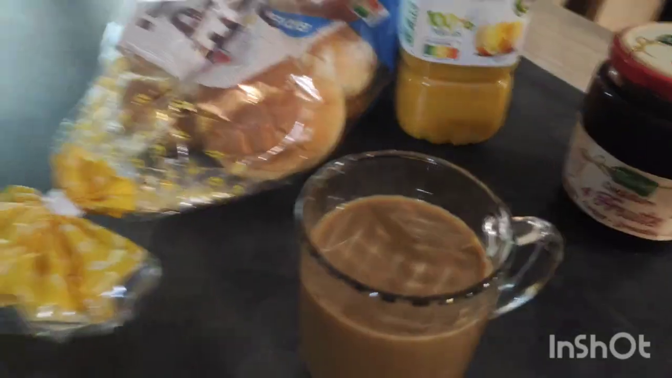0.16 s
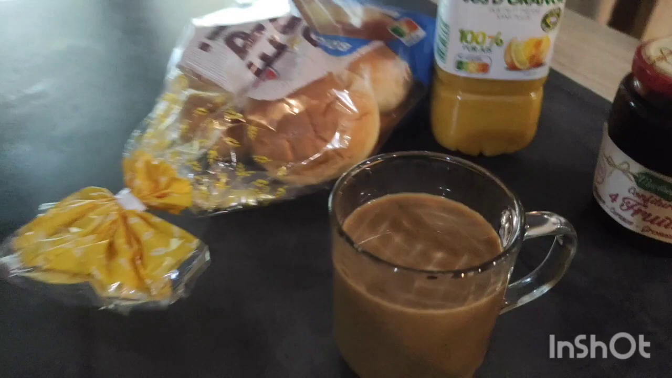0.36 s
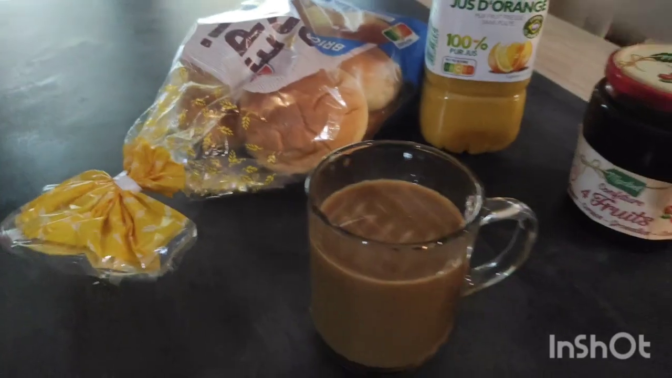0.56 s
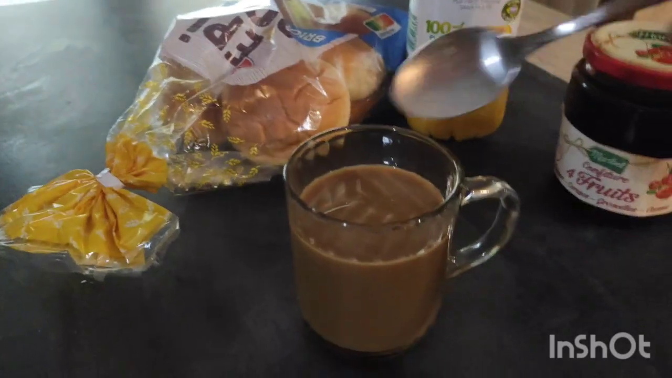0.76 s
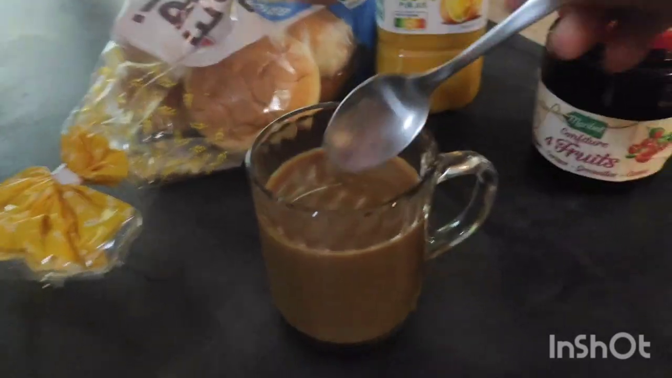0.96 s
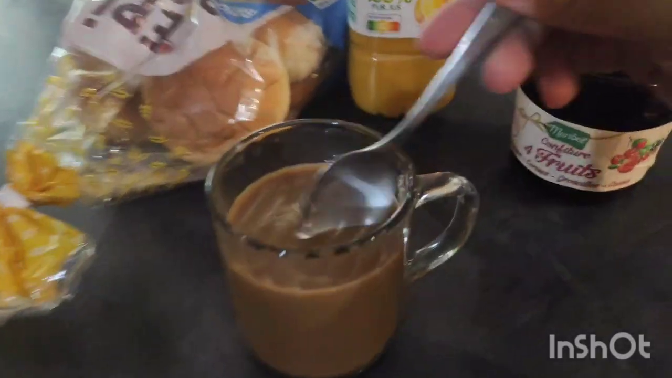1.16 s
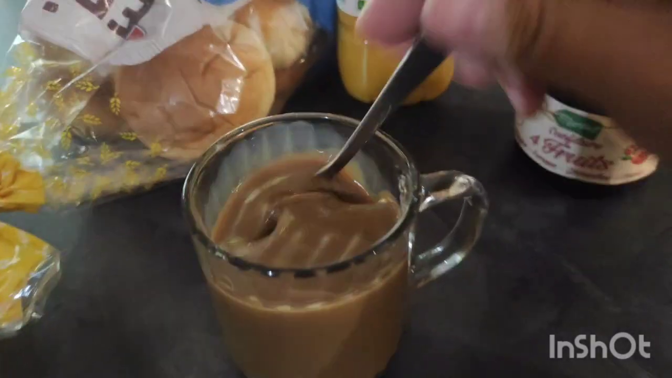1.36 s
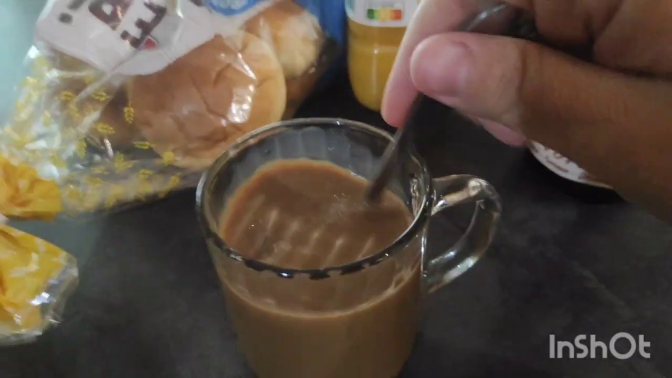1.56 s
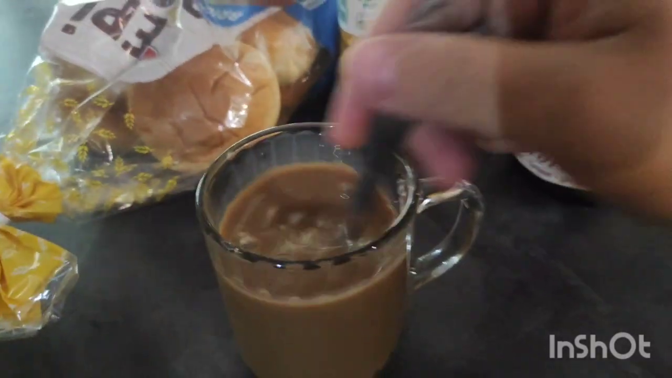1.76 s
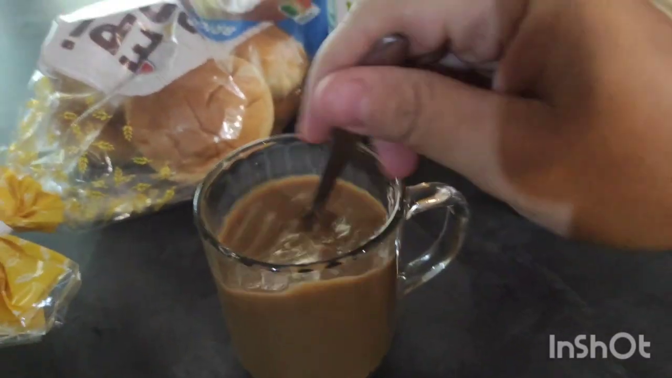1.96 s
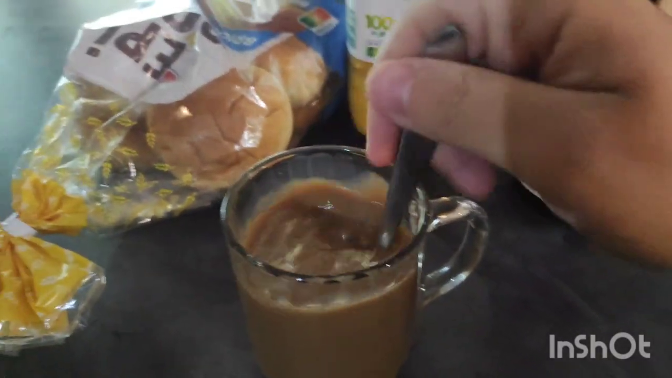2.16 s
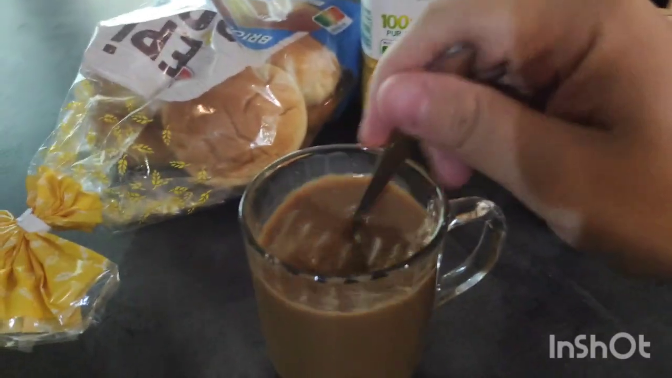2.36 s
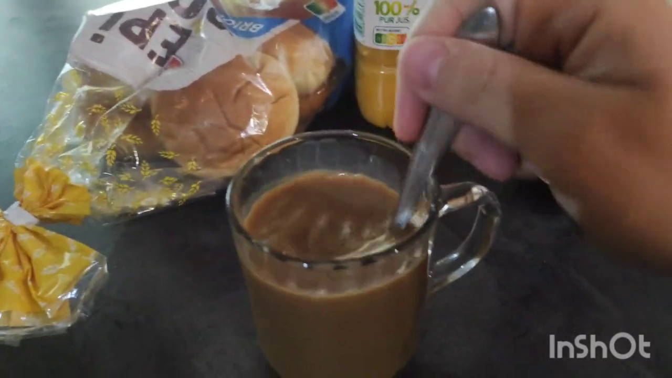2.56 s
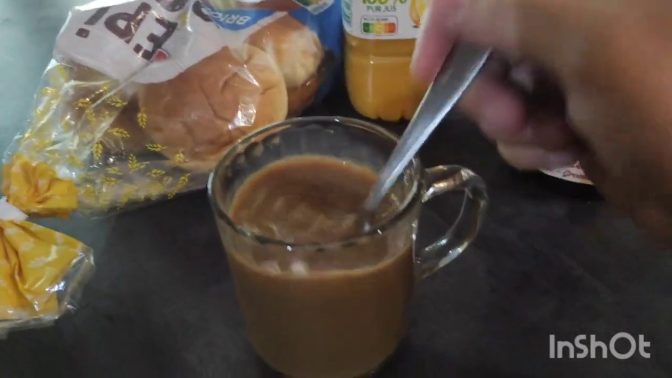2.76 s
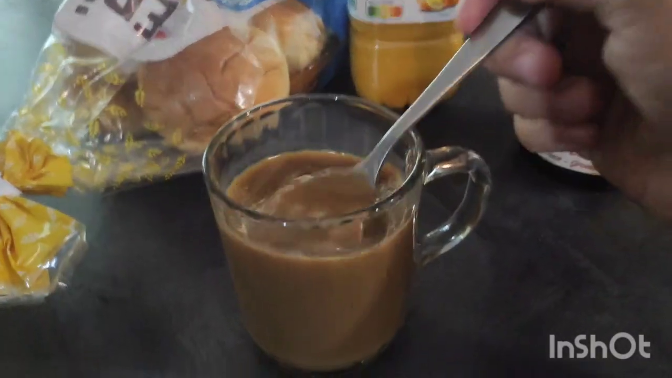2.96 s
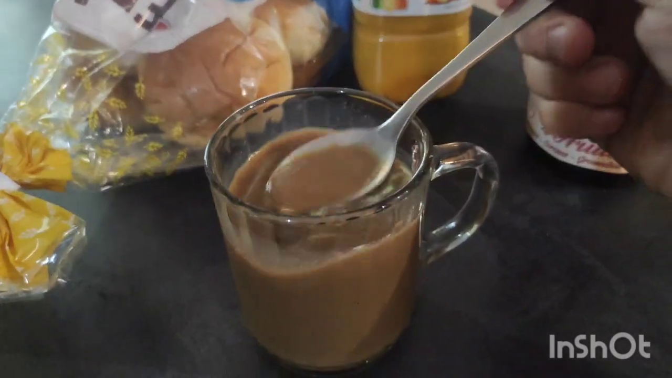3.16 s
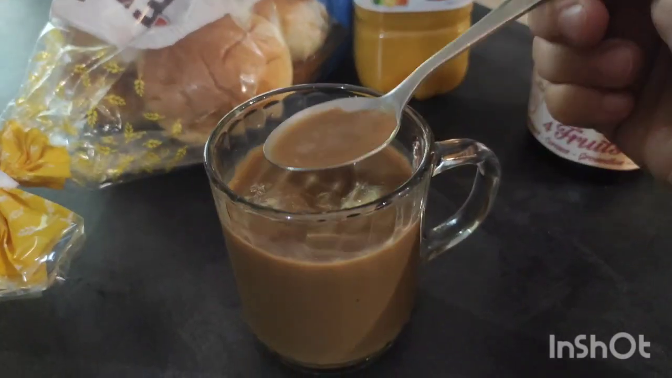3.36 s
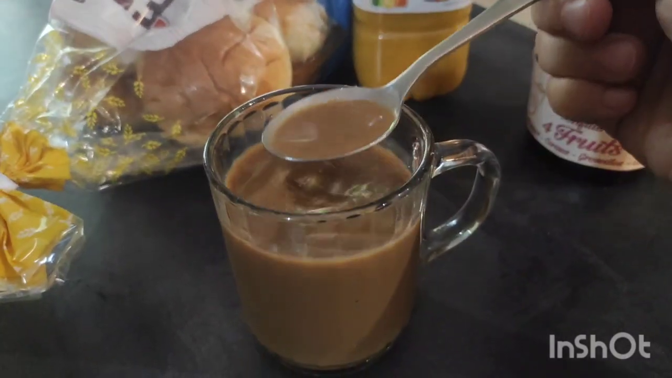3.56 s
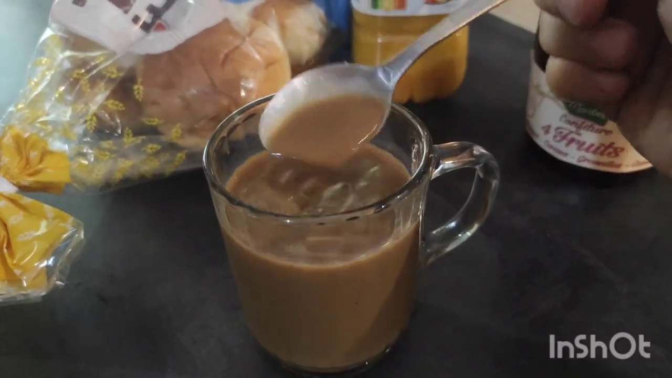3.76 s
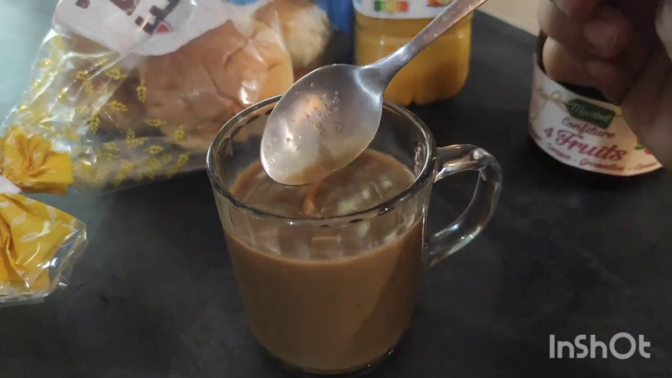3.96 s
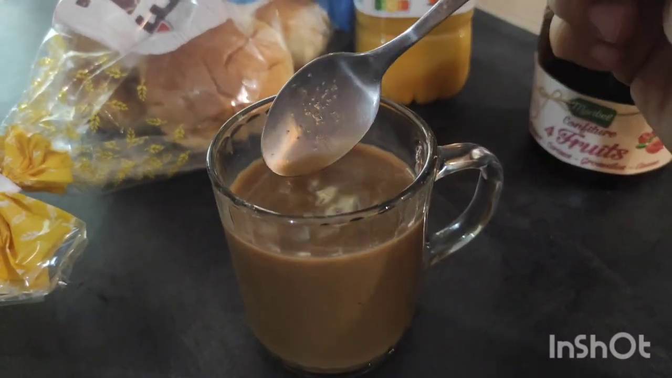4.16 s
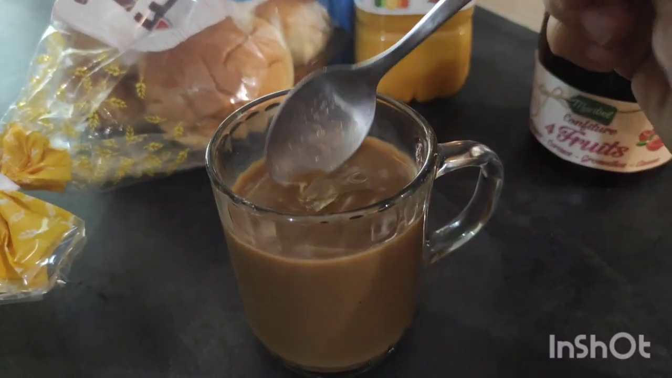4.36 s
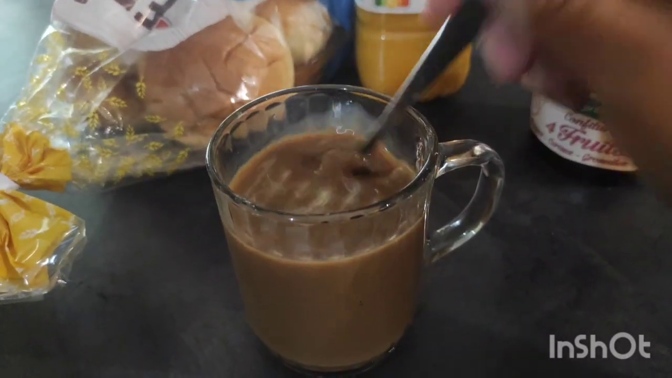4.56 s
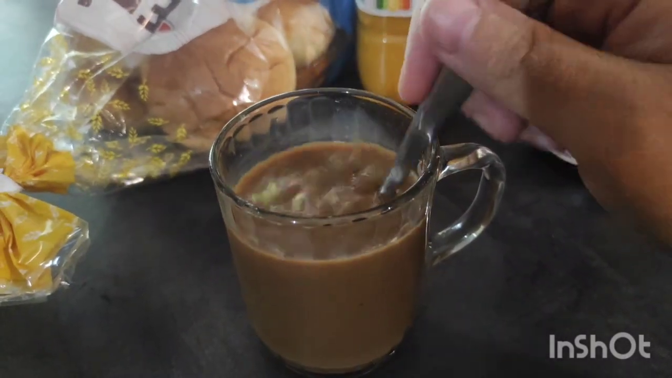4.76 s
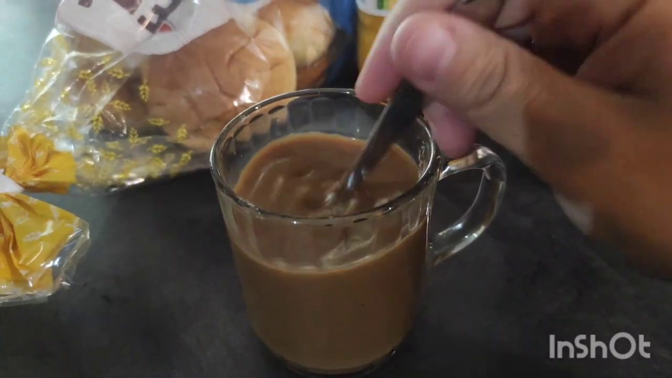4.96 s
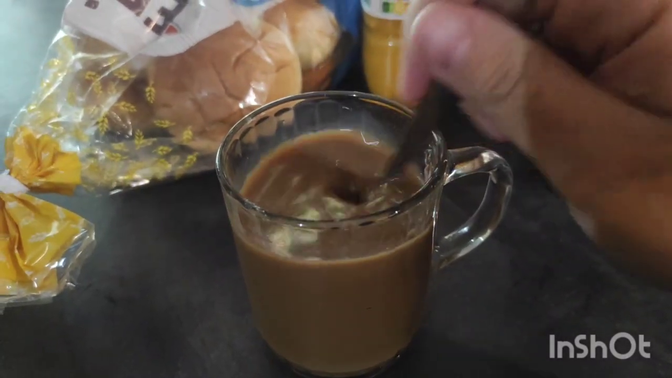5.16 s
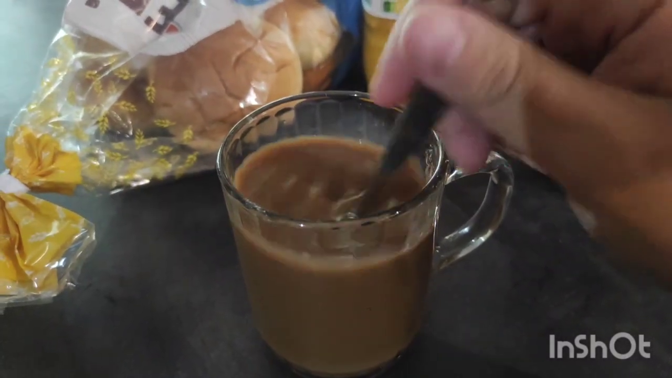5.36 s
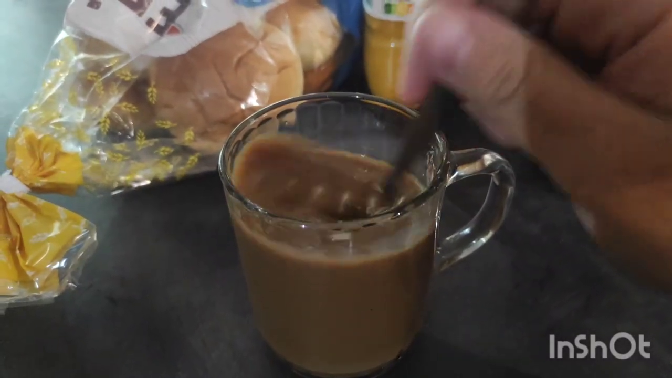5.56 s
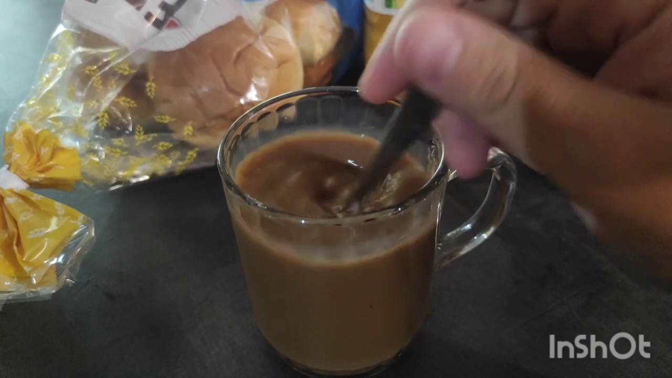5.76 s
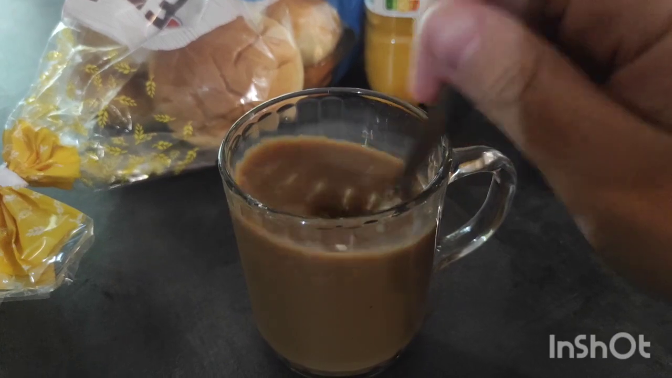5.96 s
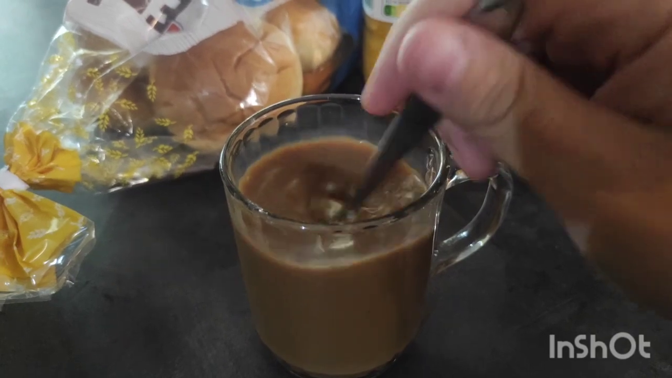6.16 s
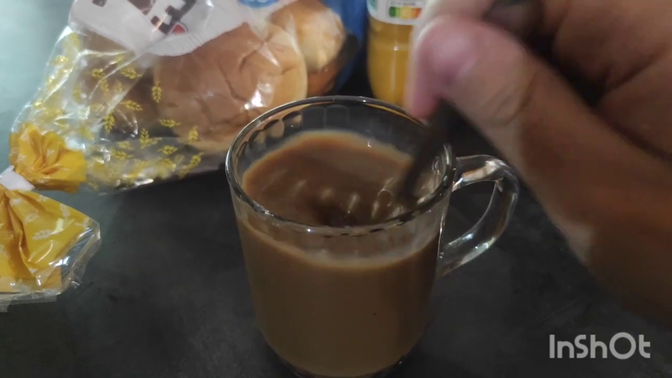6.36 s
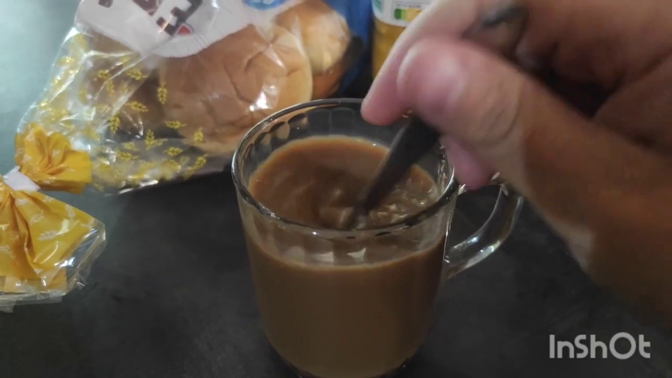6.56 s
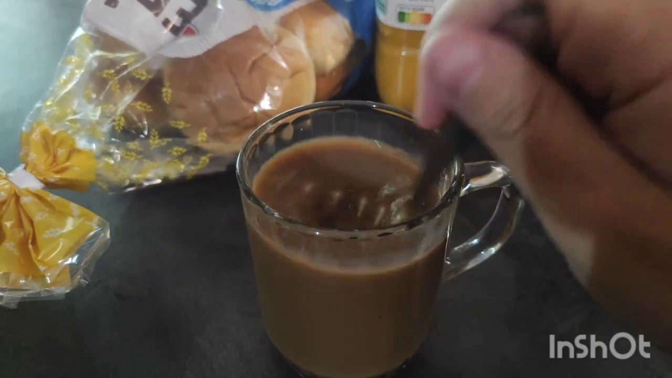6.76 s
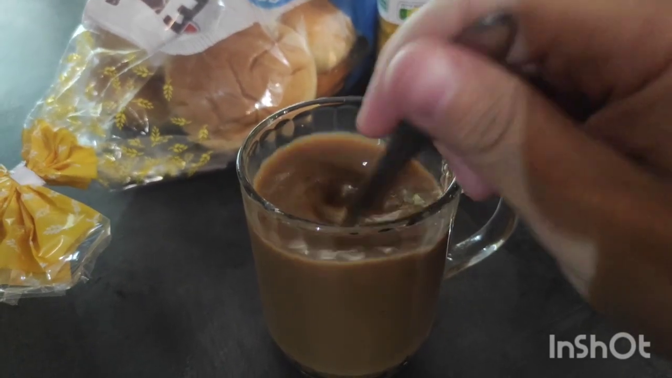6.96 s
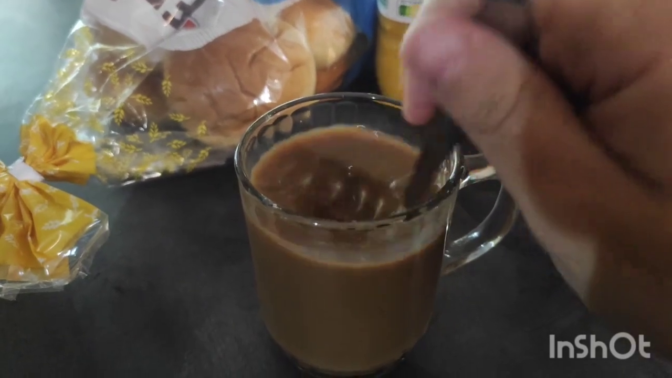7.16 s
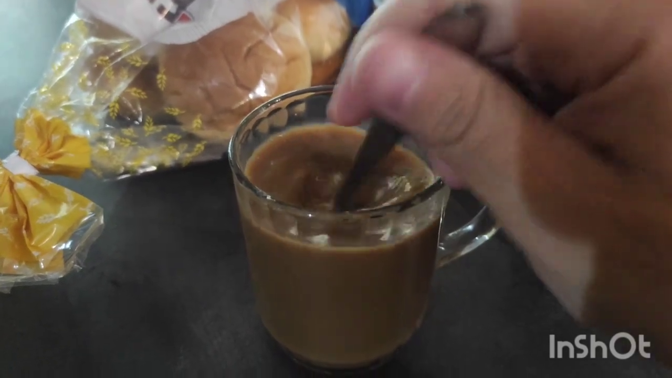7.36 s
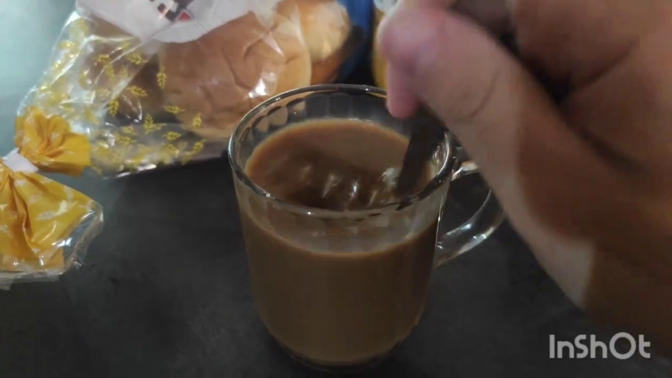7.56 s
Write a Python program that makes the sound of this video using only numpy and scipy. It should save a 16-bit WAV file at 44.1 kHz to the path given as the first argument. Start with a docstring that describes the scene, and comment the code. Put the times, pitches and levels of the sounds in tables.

```python
"""A quiet small kitchen is heard first: room tone, hum, a swelling hiss and a hand settling on a phone close by.
Then a steel teaspoon stirs a hot drink in a glass mug on the table, in two bouts with a pause.
Each blow rings modes of the glass wall, ticks in the spoon and knocks through the mug into the table;
a spoon that stays pressed on chokes the ring, and the swirling drink climbs the wall and flattens its notes.
Between blows tiny slips scrape, the wall sings, the drink laps and bubbles; a short diffuse echo follows."""
import sys
import numpy as np
from scipy import signal
from scipy.fft import rfft, irfft, next_fast_len
from scipy.io import wavfile
from scipy.ndimage import uniform_filter1d, map_coordinates

SR = 44100
rng = np.random.default_rng(int(sys.argv[2]) if len(sys.argv) > 2 else 0)


def wav_record(signal):
    """Record a signal, one row per channel, as 16-bit PCM in the file named by sys.argv[1]."""
    frames = np.transpose(np.atleast_2d(signal))
    bounded = np.clip(frames, -1, 1)
    # unit amplitude maps onto the largest positive 16-bit level
    quanta = np.round(bounded * 32767).astype(np.int16)
    wavfile.write(sys.argv[1], SR, quanta)


N = 335601
TIME = np.arange(N) / SR


def undb(db):
    """Decibels to gain."""
    return 10 ** (np.asarray(db) / 20)


def level(x, db):
    """Set the rms level over all time and both ports."""
    return x * undb(db) / np.sqrt(np.mean(x ** 2))


def curve(rows):
    """Join the (time, value) rows of a table by straight lines."""
    times, values = np.transpose(rows)
    return np.interp(TIME, times, values)


def ports(pan_db):
    """Constant-power gains of the left and right microphone ports."""
    gains = undb(np.array([[1], [-1]]) * pan_db / 2)
    return gains / np.sqrt(np.mean(gains ** 2, axis=0))


def colour(x, points, pan=((100, 0), (1000, 0))):
    """Shape a sound by a spectrum and a left-right balance, both joined on a log frequency scale."""
    size = next_fast_len(x.shape[-1])
    log_hz = np.log(np.fft.rfftfreq(size, 1 / SR) + 1)
    spectrum_hz, spectrum_db = np.transpose(points)
    balance_hz, balance_db = np.transpose(pan)
    db = np.interp(log_hz, np.log(spectrum_hz), spectrum_db)
    pan_db = np.interp(log_hz, np.log(balance_hz), balance_db)
    return irfft(rfft(x, size) * undb(db) * ports(pan_db), size)[:, :x.shape[-1]]


def noise(shared, separate):
    """White noise, partly shared by the two ports and partly different in each."""
    return shared * rng.standard_normal(N) + separate * rng.standard_normal((2, N))


def walk(rate):
    """Smooth random wandering with a spread near 1, given its new values per second."""
    knots = rng.standard_normal(int(N / SR * rate) + 2)
    return np.interp(TIME * rate, np.arange(len(knots)), knots)


def fade(t, t60, rise):
    """A quick rise and an exponential decay."""
    return (1 - np.exp(-t / rise)) * np.exp(-np.log(1000) * t / t60)


def swell(at, half_length):
    """A smooth rise and fall around a moment."""
    return np.exp(-((TIME - at) / half_length) ** 2)


def until(end, t60):
    """Hold, then die away."""
    return undb(-60 * np.maximum(TIME - end, 0) / t60)


ONSET_S = 0.012


def add(out, at, sound, db):
    """Mix in a sound, scaled so that its first ONSET_S has the given rms level."""
    start = max(int(at * SR), 0)
    gain = undb(db) / np.sqrt(np.mean(sound[:, :int(ONSET_S * SR)] ** 2))
    out[:, start:start + sound.shape[1]] += gain * sound[:, :N - start]


# The kitchen's own tone at the phone. Each row: frequency in Hz, relative density in dB per Hz.
ROOM_TONE_SPECTRUM = [(12, -42), (20, -17.5), (54, -4), (92, -22.5), (135, -10.5), (240, -4), (321, -11),
                      (381, -11.5), (412, -17), (454, -20), (617, -28), (763, -26.5), (943, -33.5),
                      (2000, -45.5), (2600, -74.5), (4400, -120)]


def room_tone():
    """Low noise of the room, alike in part at both ports, its level wandering slightly."""
    tone = colour(noise(1, 0.56), ROOM_TONE_SPECTRUM, [(60, 4.4), (300, 5)])
    return level(tone * undb(2.1 * walk(10)), -56)


def hum():
    """Mains hum, a steady sine."""
    return ports(4.7) * level(np.sin(2 * np.pi * 49.5 * TIME), -65)


# The thin hiss at the phone. Each row: frequency in Hz, relative density in dB per Hz.
HISS_SPECTRUM = [(290, -32.5), (500, -4.5), (631, -1.5), (729, -1.5), (946, -3), (1160, -7), (2260, -5.5),
                 (3200, -10.5), (5020, -14), (8090, -10), (8960, -12), (10400, -25), (14900, -35),
                 (16000, -41)]
# Its balance, used for the rustle too. Each row: frequency in Hz, left minus right in dB.
HISS_BALANCE = [(500, 5), (2400, 0), (4400, 1), (8100, 14.5), (15000, 0.5)]
# Its swells. Each row: centre in seconds, half length in seconds, level in dB.
HISS_SWELLS = [(0.07, 0.12, -58.5), (0.487, 0.14, -67), (0.935, 0.095, -52), (2.5, 0.16, -57.5)]
HISS_DB, HISS_ENDS_S, HISS_T60_S, HISS_FLOOR_DB = -63.5, 2.73, 0.73, -75


def hiss():
    """Shaped noise that swells, and dies away to a faint floor after the first bout."""
    sound = colour(noise(0, 1), [(100, -15.5)] + list(HISS_SPECTRUM), HISS_BALANCE)
    gain = undb(HISS_FLOOR_DB) + undb(HISS_DB) * until(HISS_ENDS_S, HISS_T60_S)
    for at, half, db in HISS_SWELLS:
        gain = gain + undb(db) * swell(at, half)
    return level(sound, 0) * gain


def handling(rumble_db=-57, rustle_db=-58):
    """The hand settles on the phone: a soft low rumble and one short bright rustle, both shaped noise."""
    rumble_spectrum = [(15, -8), (40, -6), (140, -6), (300, -18), (1000, -60)]
    rustle_spectrum = [(3000, -23), (5500, -1), (6700, -1), (8000, -3), (12000, -22), (16000, -32)]
    rumble = colour(rng.standard_normal(N), rumble_spectrum, [(50, 5.2), (300, 3)])
    rustle = colour(noise(0, 1), rustle_spectrum, HISS_BALANCE)
    rustle_fade = fade(np.maximum(TIME - 0.173, 0), 1.0, 0.0014)
    return level(rumble, rumble_db) * swell(0.15, 0.24) + level(rustle, rustle_db) * rustle_fade


def faint_tone():
    """One faint short tone with an unsteady level."""
    tone = level(np.sin(2 * np.pi * 644 * TIME), -56.5)
    return tone * undb(2 * walk(27)) * swell(0.44, 0.073)


# Bouts of stirring in the mug. Each row: start in seconds, end in seconds, scraping gain in dB,
# lapping gain in dB, wall singing gain in dB, growth of the scraping in dB per second.
BOUTS = [(1.401, 2.738, -61, -55, -62, -1.5), (4.654, 7.7, -55, -54, -62.5, 3)]
SAG_PER_S, RECOVER_S = 0.0155, 0.5  # relative pitch drop gained per second; time constant of its return
TURN_HZ, WOBBLE = 2.7, 0.0037  # turns of the spoon per second; relative pitch wobble of each


def swirl():
    """Pitch drop of the wall: the growing vortex flattens it, each turn wobbles it, rest restores it."""
    sag = 0
    for start, end, *_ in BOUTS:
        recovery = np.exp(-np.maximum(TIME - end, 0) / RECOVER_S)
        sag = sag + SAG_PER_S * np.clip(TIME - start, 0, end - start) * recovery
    return sag + WOBBLE * np.sin(2 * np.pi * TURN_HZ * TIME) * np.minimum(sag / 0.012, 1)


def ring(modes, rise, scatter_db, detune, port_phase, size=5000, bend=0):
    """One blow on a set of decaying modes with random strengths; a sliding spoon bends their pitch upward."""
    t = np.arange(size) / SR
    bent_time = t + bend * (t - 0.02 * (1 - np.exp(-t / 0.02)))
    out = np.zeros((2, size))
    for hz, db, t60, pan_db in modes:
        detuning, sign, lag, strength = rng.standard_normal(4)
        phase = 2 * np.pi * hz * (1 + detune * detuning) * bent_time + np.pi * (sign > 0)
        waves = np.sin([phase, phase - port_phase * lag])
        out += undb(db + scatter_db * strength) * ports(pan_db) * fade(t, t60, rise) * waves
    return out


# Modes of the glass wall, in close pairs because of the handle. Each row: frequency with the drink at rest
# in Hz, relative level in dB, free t60 in seconds, left minus right in dB, share of the swirl's pitch drop,
# share of the lean that the spoon's place gives.
GLASS = [(2036, 3, 0.46, -5.5, 1.1, 0.34), (2150, 3, 0.34, 3.5, 1.1, 1), (4420, -16, .2, 0, .3, -.3),
         (4780, -9, 0.086, -5.5, 0, 0.2), (4786, 2.5, 0.2, -5, 0, 0.31), (5093, 4.5, 0.16, 6.5, 0, 1),
         (5273, 2, .24, 6, 0.87, -.25), (5850, -18, 0.27, 1.5, 0.16, -.3),
         (6403, -2, 0.27, 15.5, 0.1, 0.26), (8344, 5, 0.092, 32, 0, 1), (8290, -4, 0.12, 18, 0, 0),
         (8450, -5, .2, 18.5, .3, -.6), (8800, -3.5, 0.11, 17, 0.072, .4), (9450, -20, 0.2, 11, 0.097, 0.3),
         (9400, -7, 0.21, 14, 0.067, 0.14), (10240, -9.5, 0.16, 17, 0.047, 0.31),
         (10850, -17.5, 0.12, 10, 0.17, 0.09), (10540, -26, 0.16, 8, 0.29, 0.26),
         (12180, -28, 0.083, 3.5, 0, 0.48), (12780, -33, .2, 4.5, 0.09, 0.0079),
         (13750, -30.5, 0.12, 1.5, 0.033, .4), (15370, -37, .17, 7, 0.23, -.7)]
# Edges between the low, middle and high groups of modes, in Hz.
GROUP_EDGES_HZ = [3000, 6800]


def wall(drop, length, side_db=0, bright_db=16):
    """Glass modes in low, middle and high groups: flattened by the swirl, choked, weighted by the side hit."""
    modes = []
    # a spoon that bounces clear makes a short, hard contact that reaches the highest modes
    hardness_db = bright_db * min(length, 1) ** 3
    for hz, db, t60, pan_db, drop_share, side_share in GLASS:
        hz = hz * (1 - drop * drop_share)
        db = db + side_share * side_db + hardness_db * max(np.log2(hz / 9500), 0)
        modes.append((hz, db, t60 * max(length, 0.05), pan_db))
    modes = np.array(modes)
    group = np.digitize(modes[:, 0], GROUP_EDGES_HZ)
    return [modes[group == k] for k in range(3)]


# The mug on the table top, a dull thump with three longer notes. Each row: frequency in Hz,
# relative level in dB, t60 in seconds, left minus right in dB.
TABLE_MODES = [(187, -17.5, 0.11, 3.5), (247.2, -5.5, 0.052, 0.5), (337, -6, 0.059, 5),
               (395, 3.5, 0.016, 1), (442, 2, 0.025, 4.5), (542, 1, 0.029, 8.5), (602, -0.5, .025, 8),
               (845, -8, 0.044, 0.5), (995, -13.5, 0.041, 1), (1476, -17.5, 0.056, 3),
               (1813, -11, 0.033, -8.5)]


def table(softness_db, soft_db=6.5, soft_tilt=0.45):
    """The table modes; a knock over soft_db above its tick is a soft, long push that favours the low ones."""
    tilt = soft_tilt * max(softness_db - soft_db, 0)  # dB per octave
    lowest_hz = TABLE_MODES[0][0]
    return [(hz, db - tilt * np.log2(hz / lowest_hz), t60, pan_db) for hz, db, t60, pan_db in TABLE_MODES]


# Clinks, the spoon swings against the wall. Each row: time in seconds; table knock, spoon tick, low wall
# ring and high wall ring, each in dB before its trim; starting pitch of the low ring while the spoon
# touches in Hz; ring length as a share of the free ring.
CLINKS = [(.9135, -29, -34.5, -30.5, -24.5, 2016, 0.63), (.9287, -47, -38.5, -24, -55, 1955, 0.84),
          (1.1026, -46.5, -40.5, -32, -45.5, 2056, 0.65), (1.3643, -44.5, -34, -29.5, -34, 2130, 0.62),
          (1.4107, -37.5, -35, -32.5, -23.5, 2150, 0.36), (1.4679, -47.5, -44, -38.5, -31.5, 2170, 0.36),
          (1.5305, -23.5, -24.5, -15, -19.5, 2060, 0.47), (1.977, -36, -39, -39.5, -49, 2060, 0.91),
          (2.035, -45, -35.5, -34.5, -32.5, 2187, .77), (2.2978, -60, -39.5, -46, -39.5, 2000, .22),
          (2.3687, -34, -37.5, -43.5, -41.5, 2230, 0.51), (2.6819, -45, -41.5, -35, -39.5, 2136, 0.68),
          (3.01, -61, -79.5, -60, -85.5, 2120, 0.87), (4.607, -31.5, -38.5, -37.5, -40, 2020, 0.99),
          (4.7097, -28, -34.5, -34, -26.5, 2183, 0.37), (4.914, -34.5, -39.5, -48, -33, 2000, 0.56),
          (4.9686, -36, -37, -51, -36.5, 2084, 0.41), (5.0433, -60, -46.5, -60, -39.5, 2100, 0.41),
          (5.1577, -37.5, -40, -42, -34.5, 2295, 0.46), (5.2287, -34, -37, -29, -25.5, 2124, 0.44),
          (5.3582, -32.5, -34.5, -51, -28.5, 2020, 0.22), (5.6365, -34, -41.5, -31, -31, 2070, 0.4),
          (5.7027, -25, -25.5, -38, -24.5, 2230, 0.14), (5.7211, -27.5, -30.5, -53, -22.5, 2100, .37),
          (5.9281, -46, -35, -34.5, -25, 2236, 0.54), (6.0044, -27.5, -34, -28.5, -20, 2150, 0.41),
          (6.189, -61, -37, -52, -32.5, 2300, 0.68), (6.2648, -41, -32.5, -44, -35, 2150, 0.62),
          (6.4382, -34, -36, -34.5, -31.5, 2000, 0.41), (6.6631, -35, -37.5, -43, -32, 2080, 0.53),
          (6.7101, -32.5, -31.5, -36.5, -30, 2250, 0.61), (6.8393, -36.5, -38, -32, -40, 2310, 0.35),
          (6.8815, -29, -27, -38, -28.5, 2036, 0.41), (6.958, -40.5, -33.5, -48, -31, 2070, 0.55),
          (7.035, -50, -36.5, -38.5, -37, 2350, 0.36), (7.1072, -34, -37.5, -39.5, -33.5, 2130, 0.46),
          (7.3411, -27.5, -33, -53, -21.5, 2120, 0.49), (7.437, -31.5, -30, -53, -33, 2220, 0.8),
          (7.5104, -47, -38, -27, -26.5, 2190, 0.2)]
# Knocks, the spoon's tip bumps along the bottom and stays pressed on. Each row: time in seconds,
# table knock in dB and spoon tick in dB, both before their trims.
KNOCKS = [(1.485, -62, -47), (1.5346, -24.5, -29), (1.549, -42, -35), (1.632, -37.5, -55),
          (1.7403, -39, -43), (1.7625, -39, -46), (1.7823, -33, -33), (1.8038, -35.5, -31),
          (1.8576, -41, -47), (1.8277, -34, -45), (1.8401, -40.5, -42), (2.052, -36, -49),
          (2.136, -41, -43.5), (2.2164, -37, -38.5), (2.2297, -29.5, -33), (2.2455, -32.5, -33.5),
          (2.26, -32, -33.5), (2.3897, -47, -37.5), (2.4672, -44.5, -43), (2.6108, -25.5, -46),
          (4.832, -34.5, -52.5), (5.0783, -66, -51), (5.133, -36.5, -40.5), (5.3278, -30.5, -29.5),
          (5.4934, -54, -44.5), (5.7388, -32, -30.5), (5.898, -39.5, -39), (5.9539, -32, -34.5),
          (6.097, -26.5, -23.5), (6.107, -40, -45), (6.1237, -33, -32), (6.147, -41, -39),
          (6.273, -31.5, -47), (6.635, -40.5, -38.5), (6.488, -26, -25.5), (6.504, -36, -33),
          (6.5212, -29.5, -28), (6.5968, -40.5, -40), (6.6485, -36.5, -37), (6.9075, -36, -34),
          (6.9456, -33, -35), (7.0477, -28, -32), (7.2448, -36.5, -39.5), (7.2799, -34.5, -30),
          (7.2884, -31.5, -37), (7.3248, -29, -28.5), (7.4244, -36, -32.5), (7.531, -31.5, -33.5),
          (7.5914, -31.5, -33.5)]
KNOCK_LOW_DB, KNOCK_HIGH_DB = -14.5, -10  # wall ring of a knock against its tick
KNOCK_HZ, KNOCK_LENGTH = 2044, 0.2  # starting pitch of its choked low note; its share of the free ring


def blows():
    """Clinks and knocks alike, in the columns of the clinks; a knock barely rings the wall."""
    rows = list(CLINKS)
    for at, knock, tick in KNOCKS:
        rows.append((at, knock, tick, tick + KNOCK_LOW_DB, tick + KNOCK_HIGH_DB, KNOCK_HZ, KNOCK_LENGTH))
    return rows


# The spoon, damped by fingers and drink. Each row: frequency in Hz, relative level in dB, t60 in seconds,
# left minus right in dB.
SPOON = [(3010, -19.5, 0.071, -2.5), (3660, -6, 0.024, -3.5), (4810, -1, 0.051, 10.5),
         (7076, -5.5, 0.045, 18), (7460, -1, 0.021, 14), (8194, -11, 0.045, 10.5), (7700, -7.5, .035, 11.5),
         (10270, -28, 0.061, 33), (11360, -19, 0.05, 7.5), (12200, -23, 0.046, 5), (13600, -19, .025, 4.5)]
# The crack of contact. Each row: frequency in Hz, relative density in dB per Hz.
CRACK_SPECTRUM = [(300, -8), (1000, 2.5), (2000, 1), (3000, 0), (4200, -2), (5000, 7.5), (5900, -4.5),
                  (7500, 2), (9400, 5.5), (10800, -39.5), (13500, -24.5), (15000, -28), (16000, -33.5)]
# Its balance at the phone. Each row: frequency in Hz, left minus right in dB.
CRACK_BALANCE = [(500, 1), (1800, -2.5), (3600, -1.5), (5000, -10), (7500, 17), (10000, 11), (13000, 2)]
# Place of the spoon round the wall. Each row: time in seconds, lean toward the upper note of the
# lowest pair in dB.
SPOON_PLACE = [(.95, -25), (1.12, -15), (1.38, 4), (1.53, -5), (2.05, 11.5), (4.6, 3), (5.0, 41), (6.0, 3),
               (6.6, -8)]
# the middle ring lies between the tick and the other two rings
MIDDLE_DB, MIDDLE_TICK_SHARE = -3.5, 0.61


def spoon_blows(touch_t60=0.14, touch_db=-2, free_db=-1, crack_t60=0.052, crack_db=-4, tick_db=-2.5,
                knock_db=-1.5, knock_delay=0.001532, touch_bend=0.084):
    """Every blow: ring of the wall, tick of the spoon, crack of the contact and knock of the table."""
    out, drop, lean_db = np.zeros((2, N)), swirl(), curve(SPOON_PLACE)
    t = np.arange(3000) / SR
    grit = colour(noise(1, 0.5), CRACK_SPECTRUM, CRACK_BALANCE)
    for at, knock, tick, low, high, touch_hz, length in blows():
        now = int(at * SR)
        low_modes, middle_modes, high_modes = wall(drop[now], length, lean_db[now])
        middle = MIDDLE_DB + MIDDLE_TICK_SHARE * tick + (1 - MIDDLE_TICK_SHARE) * (low + high) / 2
        free = np.clip(length, 0.1, 0.995)
        pressed = 1 - free ** 2
        # while the spoon presses on, it stiffens the wall: the lowest note is short, off pitch and slides up
        touch_modes = [(touch_hz, 0, touch_t60 * free * pressed + 0.0079, -4)]
        touch = ring(touch_modes, 0.0009, 0, 0, 0.3, bend=touch_bend)
        add(out, at, touch, low + touch_db + 20 * np.log10(pressed))
        low_ring = ring(low_modes, 0.00069, 1.0, 0, 0.54, size=20000)
        add(out, at, low_ring, low + free_db + 20 * np.log10(free))
        add(out, at, ring(middle_modes, 0.0007, 5, 0.012 * pressed, 0.8, size=11000), middle)
        add(out, at, ring(high_modes, 0.0011, 5, 0.0064 * pressed, 0.7, size=10000), high)
        add(out, at, ring(SPOON, 0.00022, 7.1, 0.015, 0.65, size=3000), tick + tick_db)
        start = rng.integers(N - len(t))
        crack = grit[:, start:start + len(t)] * fade(t, crack_t60, 0.00022)
        add(out, at, crack, tick + crack_db)
        # the heavy mug passes the push on to the table a moment later
        thump = ring(table(knock - tick), 0.00091, 3, 0.02, 0.2)
        add(out, at + knock_delay, thump, knock + knock_db)
    return out


PRESS_S, PRESS_DB = 0.14, 1.5  # averaging time of the drag; dB for each doubling of one plus the push


def pressure(usual_db=-33, lag_s=0.015):
    """Gain of the spoon's drag: it rises around the heavy blows and eases between them."""
    pushes = np.zeros(N)
    for at, knock, *_ in blows():
        pushes[min(int((at + lag_s) * SR), N - 1)] += undb(knock - usual_db)
    width = int(PRESS_S * SR)
    push = uniform_filter1d(uniform_filter1d(pushes, width), width // 2) * width
    return undb(PRESS_DB * np.log2(0.5 + np.maximum(push, 0) / 2))


def dragging(stop_t60=0.45):
    """Gains of scraping, lapping and singing: they follow bout and pressure; the drink settles afterwards."""
    gains = 0
    for start, end, scrape_db, lap_db, sing_db, growth_db in BOUTS:
        active = np.clip((TIME - start) / 0.05, 0, 1) * until(end, stop_t60)
        growth = undb(growth_db * (np.clip(TIME, start, end) - (start + end) / 2))
        scrape = active * growth * undb(scrape_db)
        gains = gains + np.array([scrape, active * undb(lap_db), active * undb(sing_db)])
    return gains * pressure()


def slipping(rate=130, spread_db=4, patchy_db=4):
    """Stick and slip, rate per second: mostly tiny catches, a few strong ones, louder in patches."""
    sizes = undb(spread_db * np.minimum(rng.exponential(size=N), 4)) * rng.choice([-1, 1], N)
    return (rng.random(N) < rate / SR) * sizes * undb(patchy_db * walk(30))


def waver(x, depth=0.01, rate=14):
    """Let the pitch of a sound wander as the point of contact moves."""
    place = np.arange(N) + depth * SR / rate * walk(rate)
    return np.array([map_coordinates(channel, [place], mode="mirror") for channel in x])


def scraping(slips):
    """The spoon's tiny slips excite the spoon and the upper modes of the glass."""
    _, middle_modes, high_modes = wall(0.025, 0.3)
    body = ring(SPOON, 0.0003, 0.96, 0, 0.99)
    body += 0.5 * ring(middle_modes, 0.0003, 0.91, 0, 0.7)
    body += 2.7 * ring(high_modes, 0.0003, 0.84, 0, 0.7)
    return level(waver(signal.fftconvolve(slips[None], body, axes=1)[:, :N]), 2)


def base_grumble(slips):
    """The same slips grumble through the base of the mug, exciting the table modes."""
    body = ring(TABLE_MODES, 0.00072, 1, 0, 0.38)
    return level(signal.fftconvolve(slips[None], body, axes=1)[:, :N], 0)


def singing():
    """The lowest pair sings on and wavers as the wave goes round the mug."""
    out, drop, upper = 0, swirl() + 0.002 * walk(11.0), undb(curve(SPOON_PLACE))
    for (hz, _, _, pan_db, share, _), weight in zip(GLASS, (1, upper)):
        phase = 2 * np.pi * np.cumsum(hz * (1 - drop * share)) / SR
        note = np.sin(phase) * undb(1.4 * walk(6.3))
        out = out + ports(pan_db) * level(note, 1) * weight / np.hypot(1, upper)
    return out


# The drink lapping in the mug. Each row: frequency in Hz, relative density in dB per Hz.
LAPPING_SPECTRUM = [(100, -19.5), (230, 4.5), (520, -18.5), (750, 0.5), (1300, -9.5), (2200, -5.5),
                    (3500, -34.5)]


def lapping():
    """Water noise with a restless level."""
    water = colour(noise(1, 0.38), LAPPING_SPECTRUM, [(500, 3.6), (1500, 1.5)])
    return level(water * undb(6.7 * walk(45)), 0)


def bubbles(lap_gain, bubble_db=-3, count=45):
    """Bubbles folded into the drink at random, as loud as the lapping allows; each glides upward as it closes."""
    out, t = np.zeros((2, N)), np.arange(2000) / SR
    for place, pitch, strength in rng.random((count, 3)):
        start, hz = int(place * (N - 1)), 550 * 3.2 ** pitch
        bubble = np.sin(2 * np.pi * hz * t * (1 + 4 * t)) * fade(t, 35 / hz, 0.0019)
        lap_db = 20 * np.log10(lap_gain[start] + 1e-9)
        add(out, start / SR, ports(0) * bubble, lap_db + bubble_db + 6 * strength)
    return out


def stirring():
    """Between blows the spoon drags on the glass, keeps the wall singing and moves the drink."""
    scrape_gain, lap_gain, sing_gain = dragging()
    slips = slipping()
    spoon = scrape_gain * scraping(slips) + lap_gain * base_grumble(slips)
    drink = lap_gain * lapping() + bubbles(lap_gain)
    return spoon + sing_gain * singing() + drink


# Rubs, the spoon bows one note of the wall. Each row: centre in seconds, half length in seconds,
# peak level in dB before the grip wavers, frequency at the centre in Hz, glide in Hz per second.
RUBS = [(1.437, 0.027, -42, 2150, 0), (1.63, .02, -43, 2150, 300), (1.92, 0.037, -50, 2146, -200),
        (2.112, 0.032, -38, 2134, 0), (2.196, 0.049, -36.5, 2110, 0), (2.738, 0.049, -42.5, 2100, 149.5),
        (4.959, 0.054, -48.5, 2130, 0), (5.296, .07, -44.5, 2100, -250), (6.06, 0.035, -40, 2410, -4000),
        (6.653, .03, -32, 5040, -600), (7.046, 0.017, -44, 4960, 0), (7.438, 0.018, -41, 4950, 0),
        (7.541, 0.018, -26, 5020, 0)]


def rubs(unsteady=0.00287, rough_db=2, pan_db=3):
    """Now and then the sliding spoon bows the glass, and one note swells, glides and wavers."""
    clock = np.cumsum(1 + unsteady * walk(40)) / SR
    grip = undb(rough_db * walk(80))
    notes = 0
    for at, half, db, hz, glide in RUBS:
        cycles = hz * clock + glide * (TIME - at) ** 2 / 2
        notes = notes + undb(db) * swell(at, half) * np.sin(2 * np.pi * cycles)
    return ports(pan_db) * grip * notes


# Drops from the lifted spoon and single bubbles in the swirl. Each row: time in seconds,
# onset level in dB, starting pitch in Hz.
PLIPS = [(3.833, -71, 2350), (3.909, -74.5, 8500), (4.119, -77.5, 1880), (5.585, -57, 804),
         (7.212, -42, 840)]


def plips(cycles=50, glide=2):
    """Drops and bubbles, each a short rising blip that decays by 60 dB in a set number of cycles."""
    out, t = np.zeros((2, N)), np.arange(3000) / SR
    for at, db, hz in PLIPS:
        blip = np.sin(2 * np.pi * hz * t * (1 + glide * t)) * fade(t, cycles / hz, 0.0011)
        add(out, at, ports(2) * blip, db)
    return out


# The mug's path to the two microphone ports. Each row: frequency in Hz, lead of the left port in radians.
LEFT_LEAD = [(150, .05), (500, .35), (1000, 1.1), (2000, 0.96), (5000, 1.62), (12000, 1.2)]


def to_ports(x):
    """The mug's sound reaches the right port a little later than the left."""
    size = next_fast_len(N + 2000)
    hz, lead = np.transpose(LEFT_LEAD)
    turn = np.interp(np.fft.rfftfreq(size, 1 / SR), np.r_[0, hz], np.r_[0, lead])
    return irfft(rfft(x, size) * np.exp(0.5j * np.array([[1], [-1]]) * turn), size)[:, :N]


# Echo of the small kitchen. Each row: band centre in Hz, t60 in seconds, energy against the direct sound in dB.
ROOM_ECHO = [(250, 1, -7.5), (700, 0.24, -3), (2000, 0.3, -4.5), (4820, 0.46, -9.5), (9900, 0.21, -15)]


def kitchen(x, size=22000):
    """Diffuse echo of a small room: decaying noise in bands, weakest in the treble."""
    t = np.arange(size) / SR
    log_hz = np.log(np.fft.rfftfreq(size, 1 / SR) + 1)
    centres = np.log([row[0] for row in ROOM_ECHO])
    likeness = 1 / (1 + (np.exp(log_hz) / 650) ** 4)  # long waves reach both ports alike
    alike = np.sqrt(likeness) * rfft(rng.standard_normal(size))
    apart = np.sqrt(1 - likeness) * rfft(rng.standard_normal((2, size)))
    response = 0
    for share, (_, t60, db) in zip(np.eye(len(ROOM_ECHO)), ROOM_ECHO):
        band = irfft((alike + apart) * np.interp(log_hz, centres, share), size)
        envelope = fade(t, t60, 0.0017)
        response = response + band * envelope * undb(db) / np.sqrt(np.sum(envelope ** 2))
    return signal.fftconvolve(x, response, axes=1)[:, :N]


def scene():
    """The mug in its room, with the background and the hand on the phone."""
    background = room_tone() + hum() + hiss() + faint_tone()
    mug = to_ports(spoon_blows() + stirring() + rubs() + plips())
    return background + handling() + mug + kitchen(mug)


def record(dry, top_hz=16200):
    """A steep low-pass removes everything above top_hz; the sound has no highest treble."""
    return signal.sosfilt(signal.ellip(8, 0.2, 70, top_hz, fs=SR, output="sos"), dry)


dry = scene()
out = record(dry)
wav_record(out)
```